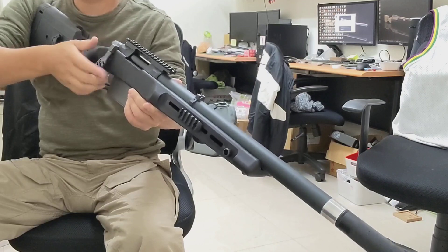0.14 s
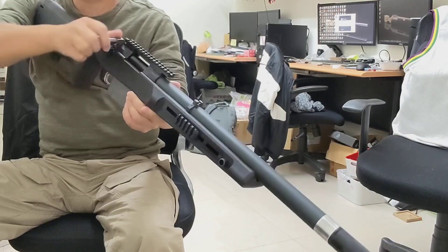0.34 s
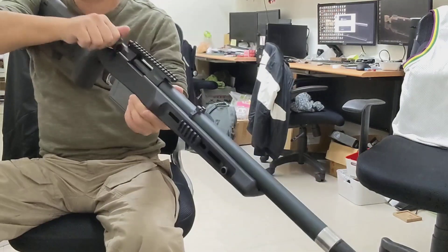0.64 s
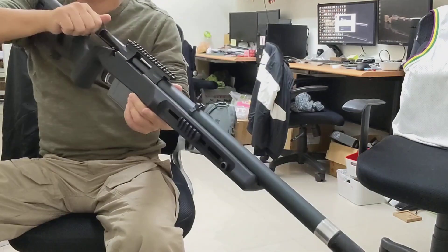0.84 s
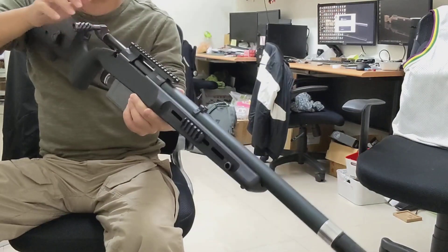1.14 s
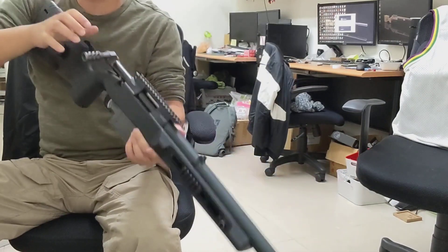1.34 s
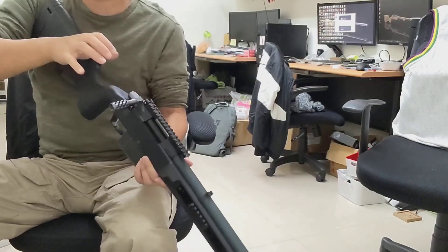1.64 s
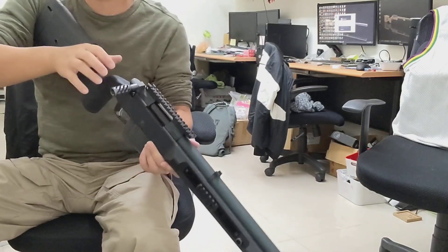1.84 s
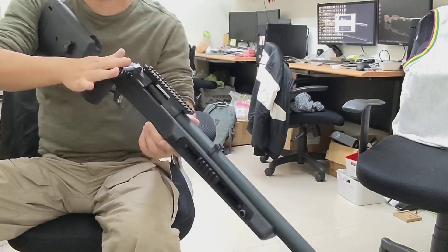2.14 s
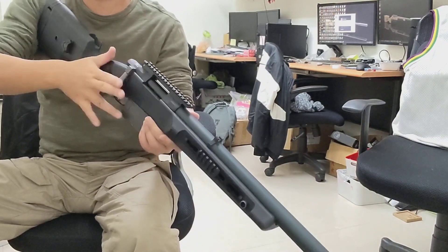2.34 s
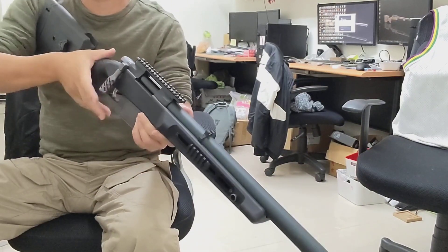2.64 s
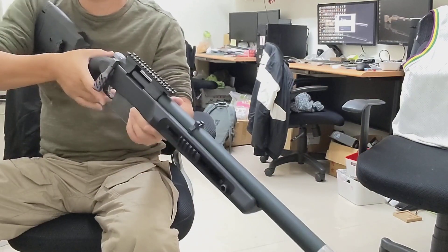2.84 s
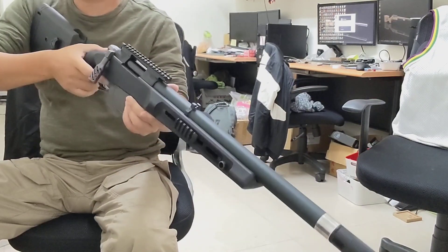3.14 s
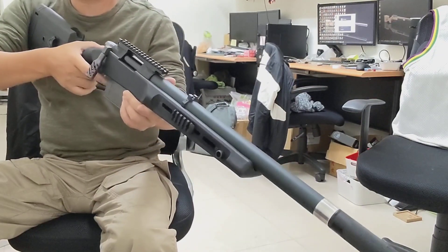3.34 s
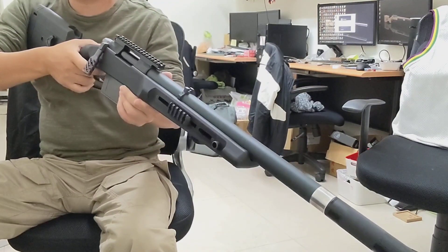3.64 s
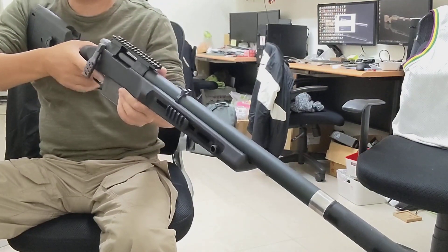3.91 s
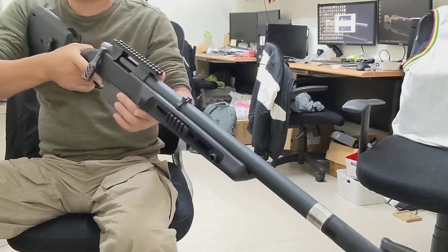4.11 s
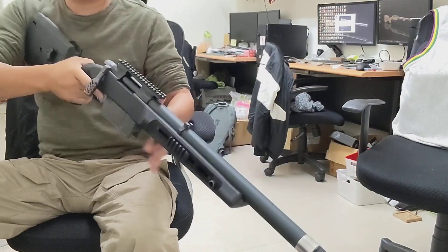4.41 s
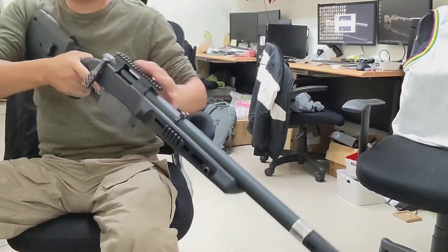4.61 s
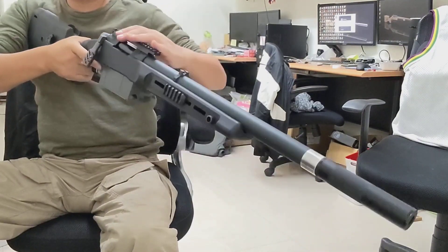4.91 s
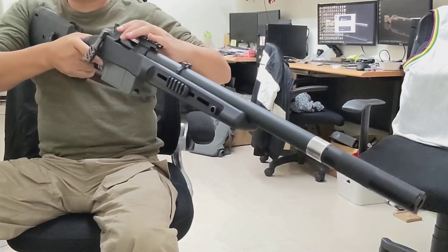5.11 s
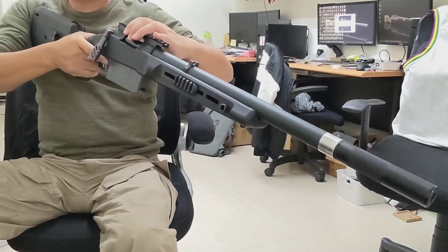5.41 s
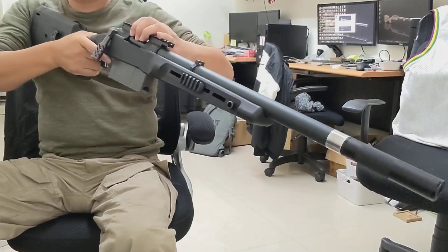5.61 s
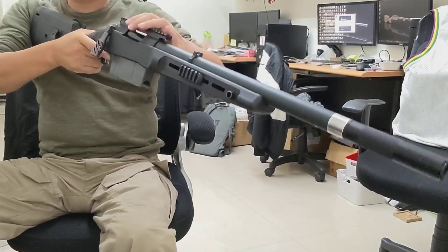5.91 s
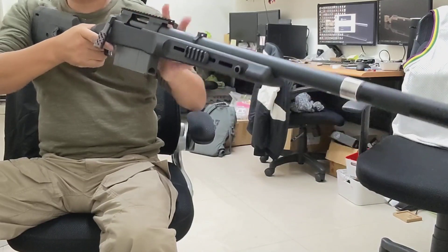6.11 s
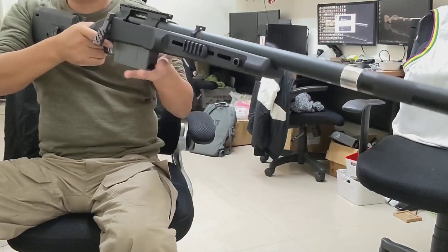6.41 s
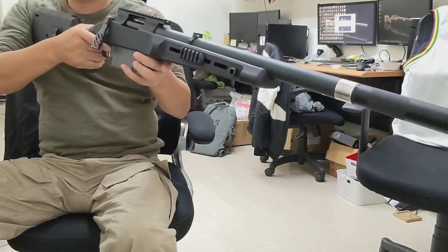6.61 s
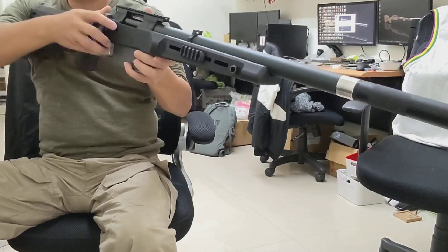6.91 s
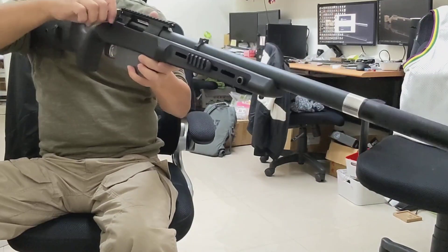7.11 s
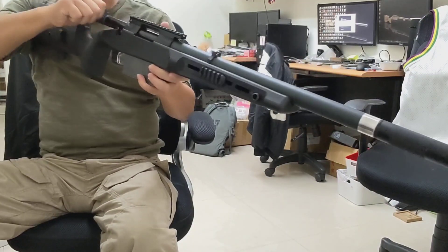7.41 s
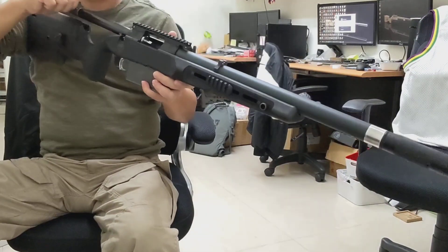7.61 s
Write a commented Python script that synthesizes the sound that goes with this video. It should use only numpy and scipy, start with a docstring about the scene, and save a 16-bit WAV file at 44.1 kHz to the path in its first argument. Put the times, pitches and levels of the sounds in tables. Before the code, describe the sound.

A bolt-action airsoft rifle is cocked with sharp metallic clacks, fired once with a thumping snap, then handled and cocked again in a hard-floored room.

```python
"""A bolt-action airsoft rifle is cocked, fired and handled in a hard-floored room with a ventilation hush.
At 0 s an earlier shot's recoil, noisy rush and ting die away; clicks and clacks (noise plus rings) run to 2.5 s.
At 3.74 s the shot adds a recoil push (low modes), a floor thud, a steel ting and a rush of jolting noise.
From 4.2 s handling clicks and scrapes follow, with a group near 5.7 s and the loudest clacks near 7.55 s.
Cloth noise swells and low thuds recur throughout; random decaying tails give the walls' answer."""
import sys
import numpy as np
from scipy import signal
from scipy.fft import rfft, irfft, next_fast_len
from scipy.io import wavfile
from scipy.ndimage import map_coordinates

SR = 44100
rng = np.random.default_rng(int(sys.argv[2]) if len(sys.argv) > 2 else 0)


def pcm_store(signal):
    """Save signal as 16-bit PCM."""
    levels = np.round(np.clip(np.atleast_2d(signal), -1, 1) * 32767)
    wavfile.write(sys.argv[1], SR, levels.astype(np.int16).T)


N = 341775

# spectrum of a bare contact, also of the rough noise: [f/Hz, relative density/dB]
CLACK_SPECTRUM = [(88, -49.5), (150, -9), (601, -12.5), (1040, -2), (1240, -5), (1600, -5), (3550, -3.5),
                  (6260, -4), (7620, -1.5), (9820, -7.5), (11000, -16.5), (14200, -10), (16000, -25)]


def amp(db):
    """Gain of a level in dB."""
    return 10 ** (np.asarray(db) / 20)


def unit(x):
    """x scaled to rms 1."""
    return x / np.sqrt(np.mean(x ** 2) + 1e-20)


def along(points, hz):
    """Interpolate (Hz, value) points on a log frequency axis."""
    f, v = np.transpose(points)
    return np.interp(np.log(hz + 1), np.log(f + 1), v)


def curves(rows):
    """One value per sample for each column after the time."""
    s, *cols = np.transpose(rows)
    return [np.interp(np.arange(N) / SR, s, c) for c in cols]


def wobble(knots_per_s):
    """Smooth random curve through normally distributed knots."""
    knots = rng.standard_normal(int(N * knots_per_s / SR) + 4)
    return map_coordinates(knots, [np.arange(N) * knots_per_s / SR])


def filtered(x, response):
    """x filtered by a function of frequency."""
    n = x.shape[-1]
    m = next_fast_len(n + 8192)
    return irfft(rfft(x, m) * response(np.fft.rfftfreq(m, 1 / SR)), m)[..., :n]


def rush(spectrum, alike):
    """Stereo noise of rms 1; mid and side shares set the left-right correlation by frequency."""
    def shares(hz):
        angle = np.arccos(np.clip(along(alike, hz), -1, 1)) / 2
        return amp(along(spectrum, hz)) * [np.cos(angle), np.sin(angle)]

    mid, side = filtered(rng.standard_normal((2, N)), shares)
    return unit(np.array([mid + side, mid - side]))


def tinted(x, bright_db, body_db, low_hz, high_hz):
    """Bass and treble of x follow their own gains."""
    body = filtered(x, lambda hz: 1 / (1 + (hz / low_hz) ** 4))
    bright = filtered(x, lambda hz: 1 - 1 / (1 + (hz / high_hz) ** 4))
    return x + (amp(body_db) - 1) * body + (amp(bright_db) - 1) * bright


def hush():
    """Ventilation: steady noise, alike on both sides only in the bass."""
    # ventilation spectrum: [f/Hz, relative density/dB]
    air_spectrum = [(15, -60), (25, -19.5), (64, -2), (87, -8.5), (114, -12.5), (236, -12.5), (270, -18),
                    (531, -28.5), (695, -38), (1070, -32), (1480, -39), (1610, -33.5), (2050, -40),
                    (3430, -59), (16000, -55)]
    return amp(-49) * rush(air_spectrum, [(60, 0.96), (300, 0.44), (2000, 0.088)])


def rustle():
    """Fabric rubs in uneven swells: noise under slow and fast random level curves."""
    # sleeves and hands on the stock: [t/s, level before tint/dB, body gain/dB]
    rubs = [(0.2, -63, -18), (0.42, -54, 1), (0.71, -53, 7.5), (1.27, -55, 5.5), (1.54, -53.5, 7.5),
            (1.61, -44.5, 2.5), (1.95, -60, 3), (2.44, -65, 7), (2.66, -50, 1.5), (3.2, -48, -0.5),
            (3.42, -56.5, 2.5), (3.71, -66, 5.5), (4.17, -58.5, -1), (4.45, -55.5, 6), (4.56, -54, 8.5),
            (4.72, -54, 3), (5.0, -55, 0.5), (5.23, -50, 0), (5.5, -48.5, -2), (5.95, -54.5, 2),
            (6.26, -62.5, 5), (6.78, -56, 0), (7.22, -63, 9), (7.41, -61.5, 1)]
    # fabric spectrum: [f/Hz, relative density/dB]
    cloth_spectrum = [(120, 1), (200, -16), (366, -10.5), (623, -17), (1060, -7), (1680, -15),
                      (2510, -13.5), (5940, -21), (7140, -19), (10700, -34), (14100, -36), (16000, -42)]
    # left-right correlation: [f/Hz, correlation]
    likeness = [(60, 0.89), (180, -0.42), (550, 1), (1650, 0.4), (4970, 0.15), (15000, -0.42)]
    db, body_db = curves(rubs)
    unevenness = amp(1.08 * wobble(11) + 0.2 * wobble(150))
    fibres = unit(unevenness * rush(cloth_spectrum, likeness))
    return amp(db) * tinted(fibres, 5.5, body_db, low_hz=1420, high_hz=4800)


def thuds():
    """Shaken floor: a wavering low mode over broad lumpy rumble swells, holds and dies away."""
    # movements on the chair and the shot:
    # [t/s, hold/s, boom level/dB, boom mean f/Hz, rumble level/dB, swell/(dB/s), boom fade/(dB/s)]
    shakes = [(0, 0.055, -32.5, 64.6, -34.5, 300, 54), (0.654, 0.096, -24, 60.5, -31.5, 490, 293),
              (.83, 0.025, -28, 55.4, -44.5, 400, 109), (1.29, .11, -34.5, 60.8, -35.5, 248, 104),
              (1.6, 0.069, -44, 62.9, -46, 200, 59), (2.0, 0.042, -44, 62.5, -56, 60, 100),
              (2.78, 0.39, -53, 52.3, -46, 300, 100), (3.21, 0.075, -36.5, 60.7, -41.5, 500, 87),
              (3.744, .03, -26.5, 63.5, -27, 3000, 48), (4.632, 0.039, -37.5, 62.4, -42.5, 151, 200),
              (4.819, 0.074, -37.5, 67.5, -34, 300, 102), (5.031, 0.022, -43, 64.7, -55, 200, 150),
              (5.749, .03, -55, 64.3, -57, 60, 80), (6.752, 0.044, -56, 65, -62, 40, 60),
              (7.12, .03, -34, 62.3, -43.5, 300, 100), (7.22, 0.033, -27, 63.2, -45, 110, 168)]
    # floor rumble spectrum: [f/Hz, relative density/dB]
    rumble_spectrum = [(13, -54), (22, -15), (45, -1.5), (64, -7.5), (118, 0), (140, -7), (173, -8.5),
                       (203, -26.5), (336, -15), (420, -29), (550, -26), (920, -120)]
    rumble_fade_ratio = 1.54  # rumble fade rate / boom fade rate
    now = np.arange(N) / SR
    waver_rad = 2 * np.pi * np.cumsum(2.86 * wobble(29)) / SR
    side_phase_rad = np.array([[0], [.3]])
    boom, rumble_gain = np.zeros((2, N)), np.zeros(N)
    for s, held, boom_db, hz, rumble_db, rise_db, fade_db in shakes:
        before, after = np.clip(s - now, 0, None), np.clip(now - s - held, 0, None)
        swell_db = -rise_db * before
        boom_gain = np.sqrt(2) * amp(boom_db + swell_db - fade_db * after)
        boom += boom_gain * np.sin(2 * np.pi * hz * (now - s) + waver_rad + side_phase_rad)
        rumble_gain += amp(rumble_db + swell_db - rumble_fade_ratio * fade_db * after)
    lumps = amp(2.6 * wobble(25))
    return boom + rumble_gain * unit(lumps * rush(rumble_spectrum, [(40, 1.0), (300, 0.48)]))


def tings():
    """Small steel part: thin modes die with an irregular level, then fade out quickly at a set time."""
    # steel modes: [f/Hz, relative level/dB, mean t60/s]
    steel_modes = [(6918, 0, .9), (7560, -7, .35), (12446, -9, .7), (15289, -17, .6)]
    # blows on the part: [t/s, base level/dB, fade-out starts at t/s]
    blows = [(0, -56, .4), (3.74, -48, 4.3), (6.845, -50.5, 7.01)]
    out, now = np.zeros(N), np.arange(N) / SR
    for s, db, fade_start in blows:
        t = np.clip(now - s, 0, None)
        fade_out = np.exp(-np.clip(now - fade_start, 0, None) / .015)
        envelope = (1 - np.exp(-t / 0.0026)) * fade_out
        for hz, level_db, t60 in steel_modes:
            gain = amp(db + level_db - 60 * t / t60 + 3.5 * wobble(22))
            out += envelope * gain * np.sin(2 * np.pi * hz * t)
    return out


def kicks():
    """The piston's stop is a low push that rings on in stock and room as decaying modes."""
    # piston recoils, the first dying away: [t/s, base level/dB]
    recoils = [(0, -26), (3.738, -19.5)]
    # low modes of stock and room: [f/Hz, relative level/dB, mean t60/s]
    low_modes = [(93, 0, 0.17), (112.6, -38, 0.33), (175.6, -8.5, 0.77)]
    out = np.zeros(N)
    for s, db in recoils:
        t = np.clip(np.arange(N) / SR - s, 0, None)
        for hz, level_db, t60 in low_modes:
            gain = amp(db + level_db - 60 * t / t60 + 3.5 * wobble(4))
            out += gain * np.sin(2 * np.pi * hz * t)
    return out


def walls(x):
    """Room answer: noise tails with t60 by frequency, redrawn for each quarter second of input."""
    # wall decay: [f/Hz, t60/s]
    decay = [(200, 0.6), (530, 0.19), (1400, 0.38), (3700, 0.41), (9700, 0.36), (15000, 0.26)]
    out, step = np.zeros((2, N + 2 * SR)), SR // 4
    for start in range(0, N, step):
        hz, t, z = signal.stft(rng.standard_normal((2, SR * 3 // 4)), SR, nperseg=256)
        # long waves reach both ports more alike
        z[1] = np.where(hz[:, None] < 700, 0.51 * z[0] + 1.14 * z[1], z[1])
        dying = z * amp(-60 * t / along(decay, hz)[:, None])
        tail = signal.istft(dying, SR, nperseg=256)[1]
        tail = tail * (1 - np.exp(-np.arange(tail.shape[1]) / (0.001 * SR)))  # echoes build up
        tail = tail / np.linalg.norm(tail[0])
        wet = signal.fftconvolve(x[None, start:start + step], tail, axes=1)
        out[:, start:start + wet.shape[1]] += wet
    return out[:, :N]


def scrapes_and_shot_rushes():
    """Scrapes, and the rough noisy rush after each shot: noise in irregular jolts sets in and stops."""
    # rushes at 0 and 3.755 s, else scrapes; rise at least 2 ms, at 0 s already on; negative fade swells:
    # [t/s, rise/s, length/s, level before tint/dB, fade/(dB/s), initial treble gain/dB, body gain/dB]
    stretches = [(0, 0.0092, .3, -25.5, 113, -3, 3), (0.726, 0.014, 0.053, -31, 150, 0, -8),
                 (0.794, .03, 0.1, -40.5, -50, 5, -29), (3.755, 0.032, 0.19, -25, 45, 2, 9.5),
                 (4.508, 0.04, 0.15, -54, 43, -9, 23.5), (4.748, 0.067, 0.14, -35, 92, -8.5, 18.5),
                 (6.044, 0.024, 0.022, -34, 37, 1, -6), (7.029, 0.035, 0.093, -46.5, 95, 7.5, 2),
                 (7.416, .01, 0.24, -29.5, 16, 7, -7.5)]
    stop_s = 0.053  # time constant
    dulling = 0.29  # dB of treble lost per dB of fade
    jolts = amp(1.2 * wobble(260) + 2.2 * wobble(40))
    rough = unit(jolts * rush(CLACK_SPECTRUM, [(300, 0.15), (3000, 0.12)]))
    out = np.zeros((2, N))
    for s, rise, length, db, fade_db, bright_db, body_db in stretches:
        t = np.arange(N) / SR - s
        onset = np.clip(t / max(rise, .002) + (s < .01), 0, 1)
        envelope = onset * np.exp(-np.clip(t - length, 0, None) / stop_s)
        lost_db = fade_db * np.clip(t, 0, length)
        tint = tinted(rough, bright_db - dulling * lost_db, body_db, low_hz=860, high_hz=6640)
        out += envelope * amp(db - lost_db) * tint
    return out


def contacts():
    """Each contact is a short rattle plus a ring and nearby modes; returns direct sound and wall feed."""
    # bolt, piston, catches and hands:
    # [t/s, nominal level/dB, body tilt/dB, treble tilt/dB, ring f/Hz, ring re rattle/dB]
    blows = [(0.2806, -45.5, -20, 11, 2400, 13), (0.3458, -32.5, -5, -1, 4300, -3),
             (0.394, -34.5, -4, 12, 7400, -3), (0.46, -27, 13.5, -1, 1098, -1),
             (0.7282, -23, 6, -6, 1040, 8), (0.7398, -21, 2, -3, 2490, 2), (0.818, -36, -25, -12, 2550, 2),
             (0.8917, -10.5, -6, -2.5, 4370, 0.5), (0.8965, -15, -6, 10, 7080, -10),
             (0.9095, -6.5, 8, 2, 4160, -4.5), (0.9149, -14.5, -5, -4, 1620, -3.5),
             (1.057, -13.5, 4.5, 2, 4530, 2), (1.062, -10.5, 3.5, 1, 2630, -3.5),
             (1.0734, -9, 2, -3.5, 1860, 1), (1.6221, -10.5, 8, -5.5, 3260, -10),
             (1.6332, -13.5, -4, -2, 3610, -21), (1.6388, -4.5, 3, 6, 5860, 4.5),
             (2.2511, -31, -0.5, -9.5, 957, 0.5), (2.4499, -20, -10, 1, 6520, -14),
             (2.4575, -11.5, -24, -1.5, 2700, -23), (2.4609, -14.5, 14.5, -5, 2300, 1),
             (3.7277, -11.5, 7, -6, 1330, -4.5), (3.7355, -2.5, 11, 1.5, 2500, -0.5),
             (3.743, -20, -15.5, 15, 2590, -1), (3.548, -49.5, -25, -15, 4150, 0.5),
             (4.229, -37.5, -20, -12, 3320, 9), (4.957, -36.5, -12, -19, 3460, 5),
             (5.681, -30, -4, 6, 7020, 13), (5.688, -27, -6, -5, 3520, -5),
             (5.7616, -11, -11, -2.5, 3430, 5.5), (5.7728, -15.5, -1, 0.5, 7550, -8),
             (6.0476, -15, -4, 1.5, 3900, -3), (6.6566, -39.5, -9, 3, 982, -14),
             (7.011, -24.5, -61, -12, 3240, 13.5), (7.0131, -27, -38, -14, 4395, 10),
             (7.0453, -28.5, 5, -12, 3120, -12), (7.0614, -27.5, -4, 6, 6630, 2),
             (7.1296, -32, 9, -7.5, 1620, -1), (7.4179, -22.5, -11, -1, 1020, 6),
             (7.4221, -6.5, -3, 7.5, 6210, -16), (7.4647, -20, -13, -5, 7050, -15),
             (7.5483, -3, -3, 3, 2575, -1), (7.5562, 1.5, -2, 5, 1580, -1.5),
             (7.5745, 0.5, -6.5, 3, 7450, -30), (7.589, -6, -5, -11, 8360, -15)]
    # modes of receiver and stock: [f/Hz]
    receiver_modes = [995, 1625, 2050, 2470, 3344, 4330, 5670, 6980]
    air_share = 0.97  # top octave's share of the treble tilt
    room_db, room_loss = -3.5, 0.57  # wall feed; dB lost per dB of ring above rattle
    near, around = np.zeros((2, N + SR)), np.zeros(N + SR)
    t = np.arange(SR // 8) / SR
    rise = 1 - np.exp(-t / 0.001)
    for s, db, body_db, bright_db, ring_hz, ring_db in blows:
        tilt = [(600, body_db), (3100, 0), (7000, bright_db), (13000, air_share * bright_db)]
        colour = lambda hz: amp(along(CLACK_SPECTRUM, hz) + along(tilt, hz))
        shared, *own = rng.standard_normal((3, len(t)))
        rattle = unit(filtered(shared + 1.83 * np.array(own), colour))
        ring = np.sin(2 * np.pi * ring_hz * t)
        for hz in receiver_modes:
            octaves = abs(np.log2(hz / ring_hz))
            mode_db = along(tilt, hz) - along(tilt, ring_hz) - 11 * octaves
            mode = np.sin(2 * np.pi * (hz * t + rng.random()))
            ring += (octaves > .15) * amp(mode_db) * mode
        ring_gain = amp(ring_db - 60 * t / 0.025) * (1 - np.exp(-t / 0.0018))
        burst = amp(db - 5) * rise * (amp(-60 * t / 0.031) * rattle + ring_gain * ring)
        i = round(s * SR)
        near[:, i:i + len(t)] += burst
        # the walls hear all sides at once: same colour, ring blurred to a hump
        hump = lambda hz: 1 + amp(ring_db + 2) / (1 + (np.log2((hz + 1) / ring_hz) / 0.2) ** 2)
        pulse = signal.unit_impulse(len(t), idx=200)
        push = filtered(pulse, lambda hz: colour(hz) * hump(hz))
        push = push * np.linalg.norm(burst[0]) / np.linalg.norm(push)
        feed_db = room_db - room_loss * max(ring_db, 0)
        around[i:i + len(t)] += amp(feed_db) * (push + 0.57 * burst[0])
    return near[:, :N], around[:N]


def scene():
    """Rifle and hands in the room; contacts, scrapes and rushes feed the walls."""
    (hits, around), rough = contacts(), scrapes_and_shot_rushes()
    room = walls(around + amp(-1) * rough.mean(axis=0))
    return hush() + rustle() + thuds() + tings() + kicks() + room + rough + hits


def record(dry):
    """Two ports differ in colour, the left hears 0.06 ms later; peaks round off; the band is limited."""
    # microphone port difference: [f/Hz, left minus right/dB]
    lean = [(60, 3.0), (150, 2.5), (380, 1), (950, 0.5), (2380, 2), (5980, 0), (15000, 6.5)]
    top_hz, fade_hz = 16680, 15850
    sides = np.array([[.5], [-.5]])

    def ports(hz):
        delay = np.exp(-2j * np.pi * hz * .00006 * sides)
        low_cut = 1 / (1 + (30 / (hz + 1)) ** 4)
        return amp(along(lean, hz) * sides) * delay * low_cut

    tone = filtered(dry, ports)
    tone = tone / (1 + np.abs(tone / .97) ** 4) ** (1 / 4)
    return filtered(tone, lambda hz: (hz < top_hz) / (1 + (hz / fade_hz) ** 150))


dry = scene()
out = record(dry)
pcm_store(out)
```